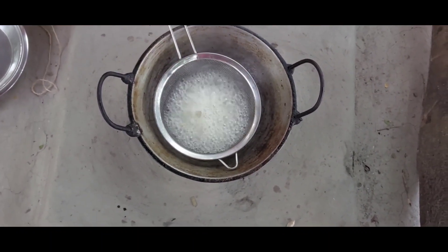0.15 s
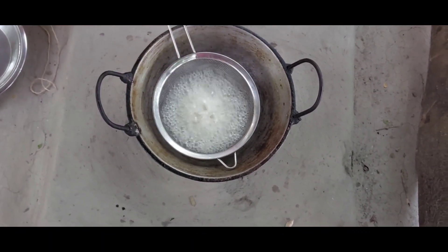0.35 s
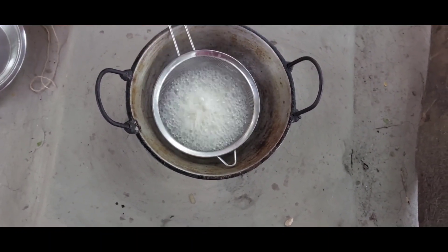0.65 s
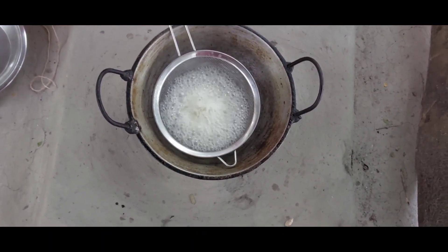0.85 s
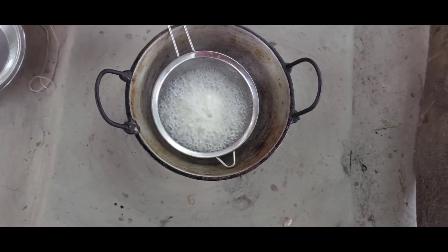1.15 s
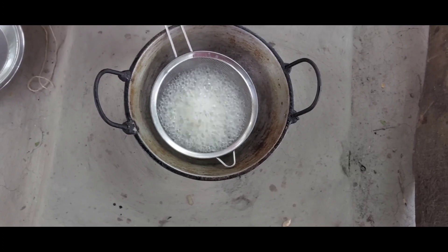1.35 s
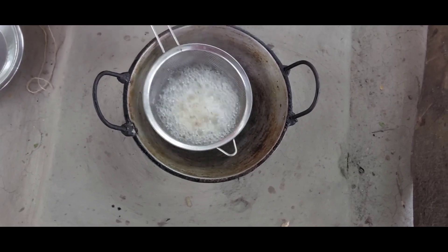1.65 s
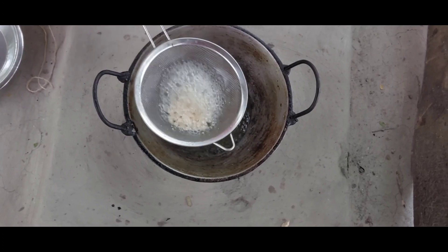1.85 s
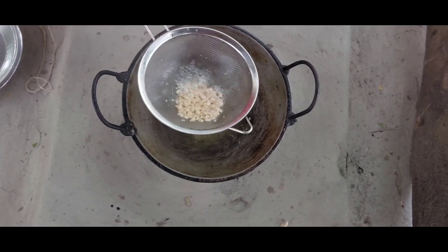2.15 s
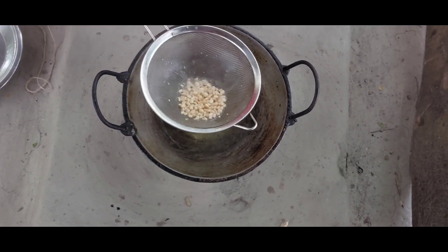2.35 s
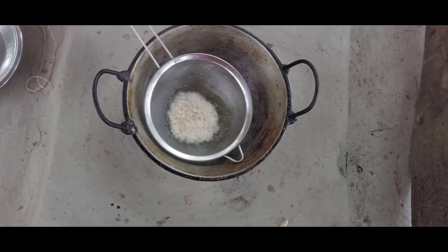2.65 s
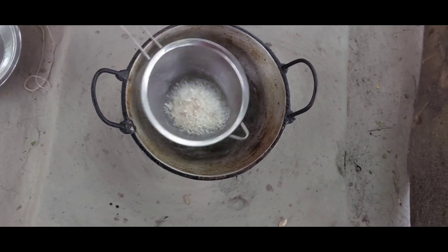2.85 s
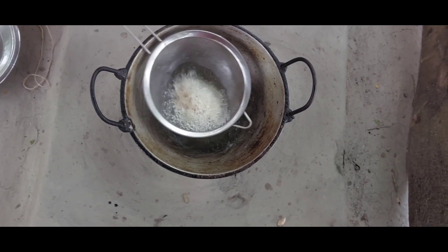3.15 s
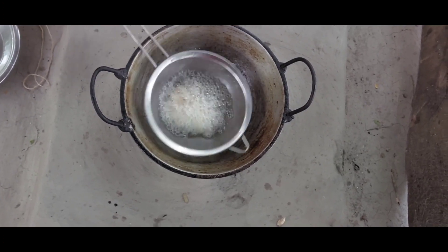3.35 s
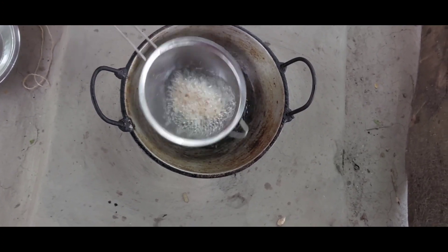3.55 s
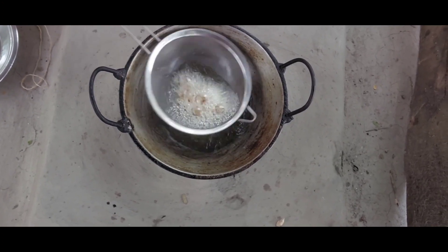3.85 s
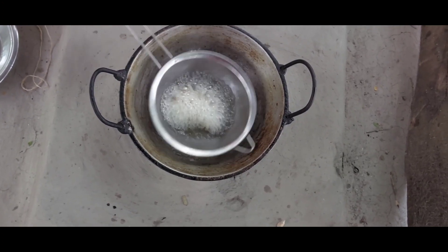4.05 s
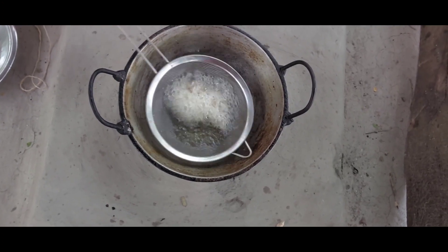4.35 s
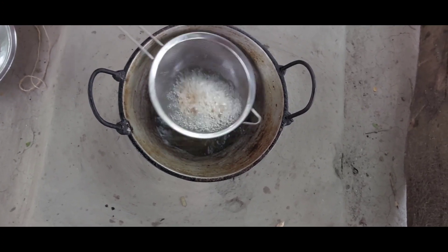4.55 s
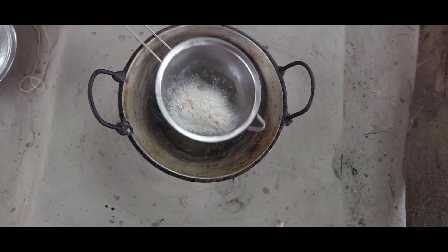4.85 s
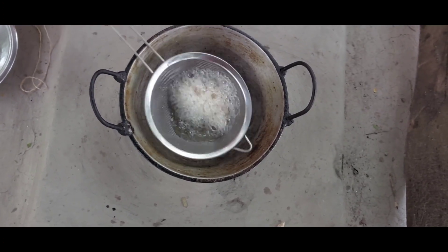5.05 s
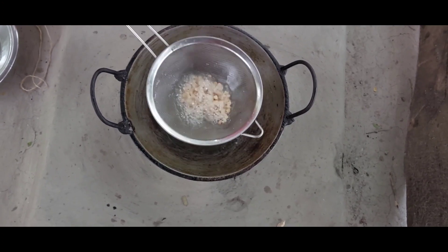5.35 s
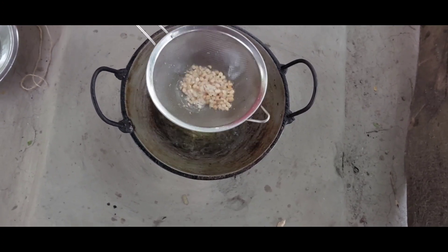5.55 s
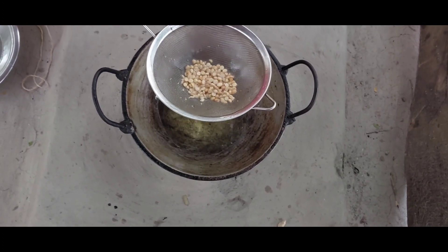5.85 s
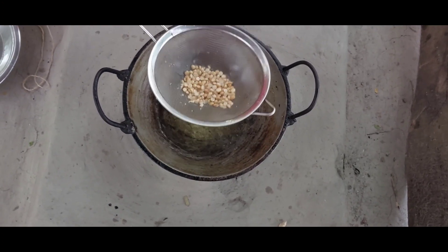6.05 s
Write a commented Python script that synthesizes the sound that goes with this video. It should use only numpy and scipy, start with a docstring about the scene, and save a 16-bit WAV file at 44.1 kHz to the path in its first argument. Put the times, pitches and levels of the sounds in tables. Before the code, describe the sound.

Hot oil boils vigorously and settles to a sizzle, with dull pops, crisp snaps, fine hissing lifts and light metal strainer knocks.

```python
"""Over an iron pan of hot oil, lentils deep-fry in a wire strainer, heard by one microphone above the pan.
Under the foam, steam bubbles boil as tiny filtered bursts over a noisy rush and burst with dull pulsed pops.
Lifted out, the wet lentils hiss, snap brightly, whistle as narrow tones and drip as rising sines.
The shaken strainer knocks on the pan with noise scuffs, resonant thuds and one wire ping.
A low rumble of lumpy noise wavers under it all, with a few soft low bumps."""
import sys
import numpy as np
from scipy import signal
from scipy.fft import rfft, irfft, next_fast_len
from scipy.io import wavfile
from scipy.ndimage import uniform_filter1d, map_coordinates

SR = 44100
rng = np.random.default_rng(int(sys.argv[2]) if len(sys.argv) > 2 else 0)


def nominal_scale(level):
    """Amplitude ratio for a level in decibels (scalar or array-like)."""
    x = np.asarray(level, float) / 20
    return 10 ** x


def store_wav(level_fs):
    """Save 16-bit WAV to argv[1]."""
    pcm = np.round(np.clip(np.atleast_2d(level_fs), -1, 1) * 32767)
    wavfile.write(sys.argv[1], SR, pcm.T.astype(np.int16))


N = 273861  # samples, about 6.21 s


def unit(x):
    """Scale to rms 1."""
    return x / np.sqrt(np.mean(x ** 2) + 1e-20)


def curves(rows):
    """Draw one value per sample for each column after the time."""
    s, *cols = np.transpose(rows)
    return [np.interp(np.arange(N) / SR, s, c) for c in cols]


def wobble(rate):
    """A smooth random curve with rate knots a second."""
    knots = rng.standard_normal(int(N * rate / SR) + 4)
    return map_coordinates(knots, [np.arange(N) * rate / SR])


def bells(rows):
    """Sum of smooth humps (time [s], height, half length to 1/e [s])."""
    t = np.arange(N) / SR
    return sum(height * np.exp(-((t - s) / half) ** 2) for s, height, half in rows)


def filtered(x, response):
    """Multiply the spectrum of x by a complex response of frequency."""
    m = next_fast_len(N + 8192)
    return irfft(rfft(x, m) * response(np.fft.rfftfreq(m, 1 / SR)), m)[..., :N]


def resonance(f, centre, width):
    """Response of one damped mode, 1 at its centre; all in Hz."""
    return 1j * f * width / (centre * centre - f * f + 1j * f * width)


def coloured(x, spectrum):
    """Pass x through a causal minimum-phase filter with points (frequency [Hz], gain [dB])."""
    f, db = np.transpose(spectrum)
    hz = np.fft.rfftfreq(4096, 1 / SR)
    cepstrum = irfft(np.log(nominal_scale(np.interp(np.log(hz + 1), np.log(f), db))))
    # folding the cepstrum forward in time makes the filter causal
    cepstrum[1:len(hz) - 1] *= 2
    cepstrum[len(hz):] = 0
    impulse = irfft(np.exp(rfft(cepstrum)))
    return signal.fftconvolve(x, impulse)[:N]


def patchy(depth_db):
    """Noise whose gain varies in small patches of time and pitch, as bubbles come in clusters."""
    z = signal.stft(rng.standard_normal(N), nperseg=256)[2]
    field = uniform_filter1d(rng.standard_normal(z.shape), size=4, axis=0)
    field = uniform_filter1d(field, size=8, axis=1)
    return signal.istft(z * nominal_scale(depth_db * unit(field)), nperseg=256)[1][:N]


def bubbles(spectrum, grain_spectrum, per_s, spread_db, flicker_db, grain_db):
    """Tiny bursts of uneven size over a smooth rush; a random inverted echo gives each its own tone."""
    when, lag = rng.random((2, 20000))
    live = np.clip(per_s * N / SR - np.arange(len(when)), 0, 1)  # only as many bursts as the rate asks for
    size = live * nominal_scale(spread_db * np.clip(rng.standard_normal(len(when)), -3, 2.6))
    at = (when * N).astype(int)
    echo_at = at + 2 + (24 * lag).astype(int)
    train = np.bincount(at, -size, N + 64) + np.bincount(echo_at, size, N + 64)
    swell = nominal_scale(flicker_db * (wobble(9) + wobble(30)))
    grains = unit(coloured(train, grain_spectrum))
    rush = unit(coloured(patchy(depth_db=1.65), spectrum))
    return swell * (nominal_scale(grain_db) * grains + rush) / np.sqrt(1 + nominal_scale(grain_db) ** 2)


def pops(rows, lead, tail_db, tail_s):
    """Each pop: suction, a push half a ring period later, a slow rebound and scattered echoes off the pan."""
    out, t = np.zeros(N + SR), np.arange(1600) / SR
    middle = 400  # sample of the push
    scatters = rng.standard_normal((len(rows), len(t)))
    for (s, db, hz, sharp), scatter in zip(rows, scatters):
        def pulse(turns, wide):
            periods = hz * (t - middle / SR) - turns
            return np.exp(-(2 * sharp / wide * periods) ** 2) / wide

        suction, push, rebound = pulse(-0.49, 1), pulse(0, 0.9), pulse(0.47, 1.68)
        pop = push - lead * suction - (1 - lead) * rebound
        echoes = scatter * nominal_scale(tail_db - 60 * t / tail_s) * (t > .0004)
        tail = np.convolve(pop, echoes)[:len(t)] / np.sqrt(SR / hz)
        out[round(s * SR):][:len(t)] += nominal_scale(db) * (pop + tail)
    return out[middle:middle + N]


def scattered(level_db, count, spread_db, low_hz, high_hz, sharp):
    """Rows for small pops at random moments, their size following a level."""
    when, size, pitch = rng.random((count, 3)).T
    db = level_db[(when * N).astype(int)] - spread_db * size
    hz = low_hz * (high_hz / low_hz) ** pitch
    return list(zip(when * N / SR, db, hz, sharp + 0 * when))


def levels():
    """Boil, sizzle, hiss and how far the boil covers the hiss, in dB; each shake bares the lentils briefly."""
    # course of the frying, before shakes and trims: boil in the oil, sizzle at the surface, hiss of
    # the bared lentils: (time [s], boil [dB], sizzle [dB], hiss [dB])
    fry_course = [(0, -45.5, -51, -64.5), (.09, -48.5, -58, -71.5), (.3, -52.5, -60, -69),
                  (.63, -57.5, -60.5, -76), (.92, -58, -61.5, -76.5), (1.2, -58, -57.5, -72.5),
                  (1.43, -60, -59.5, -73), (1.53, -56.5, -59.5, -64.5), (1.71, -61, -58, -59.5),
                  (1.93, -67, -55, -53.5), (2.07, -63, -54.5, -51), (2.19, -63, -56, -51),
                  (2.24, -58, -55.5, -44.5), (2.37, -60, -53.5, -47.5), (2.52, -66, -54.5, -52.5),
                  (2.61, -71, -53, -49.5), (2.7, -64, -52, -59), (2.79, -64, -60, -65),
                  (2.87, -58.5, -55.5, -64.5), (3.4, -58, -56, -62.5), (4.05, -58, -55.5, -61.5),
                  (4.55, -56.5, -54, -61.5), (5.0, -57.5, -55.5, -63), (5.15, -61.5, -56.5, -63),
                  (5.29, -64.5, -50.5, -53), (5.5, -66, -52.5, -47.5), (5.68, -64, -53, -48),
                  (5.78, -65.5, -57.5, -49), (6.21, -67.5, -57, -51)]
    # shakes of the strainer: (time [s], swell of the hiss [dB])
    shake_rows = [(2.97, 3.5), (3.27, 3), (3.6, 6.5), (3.97, 3), (4.3, 1.5), (4.64, -1), (4.82, 1)]
    boil_db, sizzle_db, hiss_db = curves(fry_course)
    shake_db = bells([(s, db, 0.06) for s, db in shake_rows])
    boil_db = boil_db - 0.3 * shake_db
    sizzle_db = sizzle_db + 0.6 * shake_db
    hiss_db = hiss_db + shake_db
    return boil_db, sizzle_db, hiss_db, boil_db - hiss_db


def frying():
    """Four sizes of steam bubble: deep boil, surface sizzle, fizz, fine hiss."""
    # colours of the smooth rushes and of the boil's single bursts: (frequency [Hz], relative level [dB])
    crackle_spectrum = [(150, -30), (330, -16), (600, -2), (1000, 7), (1400, 0), (1900, -10), (2800, 0),
                        (4500, -9), (7000, -25.5)]
    boil_spectrum = [(250, -53), (480, -36.5), (700, -8.5), (1000, 1), (1400, 2.5), (1900, -6.5),
                     (2800, -11), (3800, -18.5), (5000, -37)]
    sizzle_spectrum = [(900, -34), (1500, -9.5), (2000, -4), (2800, -0.5), (3700, -0.5), (4500, -8),
                       (6000, -25.5), (9000, -45.5)]
    fizz_spectrum = [(2500, -33), (4000, -0.5), (4800, 0), (6100, 0), (7500, -6.5), (10000, -17),
                     (14000, -40)]
    hiss_spectrum = [(4000, -34.5), (6500, -1), (8000, 0.5), (10600, 3), (13800, -4.5), (15700, -8.5),
                     (16600, -37)]
    boil_db, sizzle_db, hiss_db, cover_db = levels()
    fizz_db = sizzle_db + 0.43 * (hiss_db - sizzle_db) - 1.5  # between sizzle and hiss
    # the more the boil covers the hiss, the more single bubbles stand out
    crackle_db = -9.5 + 0.65 * cover_db
    spit_db = -4.5 + 0.27 * cover_db
    boil = nominal_scale(boil_db + 0.54) * bubbles(
        boil_spectrum, crackle_spectrum, per_s=200, spread_db=2.5, flicker_db=0.9, grain_db=crackle_db)
    sizzle = nominal_scale(sizzle_db + 0.26) * bubbles(
        sizzle_spectrum, sizzle_spectrum, per_s=700, spread_db=3, flicker_db=1.36, grain_db=-6)
    fizz = nominal_scale(fizz_db + 2.0) * bubbles(
        fizz_spectrum, fizz_spectrum, per_s=500, spread_db=5.5, flicker_db=0.1, grain_db=spit_db - 3.5)
    hiss = nominal_scale(hiss_db - 0.76) * bubbles(
        hiss_spectrum, hiss_spectrum, per_s=250, spread_db=3.5, flicker_db=0.9, grain_db=spit_db)
    # foam dulls the top of the hiss
    top = filtered(hiss, lambda hz: 1 / (1 + (11500 / (hz + 1)) ** 12))
    top_gain = nominal_scale(0.5 - 0.2 * cover_db)
    return boil + sizzle + fizz + hiss + (top_gain - 1) * top


def rumble():
    """Lumpy low noise that swells now and then, and above it the murmur of the covered boil."""
    # swells added to the floor of the rumble: (time [s], height [dB], half length to 1/e [s])
    swell_rows = [(0.054, -70, 0.034), (0.55, -63, 0.049), (0.82, -67, .02), (.95, -66, 0.054),
                  (1.225, -60, 0.045), (1.696, -74, 0.081), (1.956, -74, 0.042), (2.26, -79, 0.071),
                  (2.466, -64, 0.033), (2.57, -70, 0.035), (2.89, -74, 0.028), (3.272, -79, 0.046),
                  (3.555, -64.5, 0.057), (3.81, -76, 0.051), (4.08, -81, 0.041), (4.406, -62, 0.053),
                  (4.598, -63, 0.046), (4.842, -67, .07), (5.293, -68.5, .06), (5.47, -74, 0.027),
                  (5.697, -82, 0.054), (5.96, -76, .03), (6.17, -75, .06)]
    # colours of rumble and murmur: (frequency [Hz], relative level [dB])
    low_spectrum = [(20, -34), (35, -9), (55, 0), (75, -8), (110, -16), (200, -48)]
    murmur_spectrum = [(60, -7.5), (110, -1), (170, 0), (250, -9), (400, -13.5), (700, -29)]
    swells = bells([(s, nominal_scale(db), half) for s, db, half in swell_rows])
    low_gain = nominal_scale(-81.5 + 2.7 * wobble(9.6)) + swells
    low = low_gain * unit(coloured(rng.standard_normal(N), low_spectrum))
    cover_db = levels()[3]
    murmur_gain = nominal_scale(-85 + 0.48 * cover_db + 3.6 * wobble(29))
    return low + murmur_gain * unit(coloured(rng.standard_normal(N), murmur_spectrum))


def bursts():
    """Steam bursts under the foam: big ones, and many small ones while the boil covers the hiss."""
    # big bursts, before the foam's colouring: (time [s], level [dB], ring [Hz], sharpness [1])
    burst_rows = [(0.0187, -20.5, 1170, 4.6), (0.0276, -20.5, 1060, 4.4), (0.0333, -27, 935, 3.6),
                  (0.0409, -28, 880, 2.9), (0.0683, -32, 1030, 6.3), (0.0832, -22.5, 1250, 4.2),
                  (0.1138, -24.5, 835, 2.6), (0.1383, -30, 700, 7.0), (0.1784, -33, 820, 3.5),
                  (0.1836, -33, 1050, 2.3), (0.2074, -36, 775, 3.5), (0.2414, -23.5, 940, 5.4),
                  (0.256, -25.5, 1120, 3.2), (0.2595, -30, 835, 5.5), (0.2753, -31.5, 790, 5.5),
                  (0.3193, -28, 840, 4.0), (0.3391, -34, 1140, 4.2), (0.343, -23.5, 830, 3.8),
                  (0.3538, -29.5, 890, 4.5), (0.3785, -33, 980, 4.1), (0.4168, -31.5, 840, 4.4),
                  (0.4538, -30, 1010, 4.1), (0.5104, -29, 840, 3.9), (0.531, -33, 900, 2.5),
                  (0.5532, -37, 820, 4.6), (0.6266, -31.5, 930, 5.2), (0.6736, -29, 1010, 3.1),
                  (0.6917, -34, 950, 3.9), (0.7076, -25.5, 790, 3.8), (0.7296, -27.5, 1120, 4.4),
                  (0.7907, -16, 894, 5.7), (0.8154, -30.5, 980, 3.7), (0.9071, -30, 920, 2.7),
                  (0.9273, -32.5, 830, 5.2), (0.9609, -18, 846, 4.05), (0.9653, -31, 814, 4.5),
                  (0.9724, -32.5, 940, 3.7), (1.0462, -34, 826, 5.5), (1.146, -35, 935, 4.7),
                  (1.1668, -24, 1030, 3.4), (1.1798, -18.5, 950, 5.2), (1.3786, -32.5, 930, 3.3),
                  (1.4137, -31, 830, 4.3), (1.5634, -24.5, 1170, 3.4), (1.6103, -36, 900, 3.7),
                  (1.7285, -24, 1750, 3), (1.9866, -28, 2000, 7.7), (2.054, -26.5, 2040, 3.5),
                  (2.0832, -36, 3180, 2.5), (3.1616, -32, 880, 2.8), (3.5099, -39.5, 2500, 2.8)]
    # what the foam lets through: (frequency [Hz], gain [dB])
    foam_gain = [(150, -14.5), (350, -9), (700, 0), (1800, -0.5), (2800, 4.5), (4500, 8.5), (9000, -3)]
    boil_db, _, _, cover_db = levels()
    small = scattered(boil_db + 8 + 0.7 * cover_db, count=560, spread_db=17,
                      low_hz=610, high_hz=1310, sharp=4.9)
    return coloured(pops(burst_rows + small, lead=0.33, tail_db=-6.0, tail_s=0.014), foam_gain)


def snaps():
    """Bright surface snaps: big ones and many small ones, most prominent while foam hides the hiss."""
    # big snaps: (time [s], level [dB], ring [Hz])
    snap_rows = [(0.1199, -38, 4700), (0.1515, -29, 10000), (0.5262, -29.5, 4570), (1.1343, -32.5, 13900),
                 (1.4841, -36, 8600), (1.4954, -33.5, 14000), (1.5032, -28, 5000), (1.5801, -31, 14000),
                 (1.6373, -30, 10500), (1.6483, -31, 9700), (1.6662, -21.5, 12400), (1.6704, -26, 14000),
                 (1.6747, -23, 9800), (1.6869, -27, 8500), (1.6929, -26, 13600), (1.7256, -25, 12900),
                 (1.7308, -35, 4600), (1.738, -23, 11600), (1.7652, -20, 13400), (1.7724, -23, 11500),
                 (1.7856, -29, 12000), (1.816, -29, 11700), (1.8984, -28, 13100), (1.9283, -26, 14000),
                 (1.9865, -20, 9050), (2.0902, -31, 9300), (2.1237, -26, 7400), (2.6986, -17.5, 9900),
                 (2.767, -35, 13400), (2.8863, -33, 9600), (3.0421, -39, 11300), (3.0744, -33, 9400),
                 (3.2653, -16.5, 14300), (3.29, -36, 12000), (3.3097, -34, 8400), (3.5102, -29, 8400),
                 (3.7214, -29, 13000), (3.8534, -37, 13000), (3.93, -37, 14000), (3.9767, -38, 13100),
                 (4.2577, -31, 11800), (4.3264, -8.5, 7700), (4.3364, -35, 12800), (4.4824, -31, 14000),
                 (4.66, -39, 14000)]
    sharpness = 1.52
    _, _, hiss_db, cover_db = levels()
    small = scattered(hiss_db + 26.5 + 0.5 * cover_db, count=260, spread_db=18,
                      low_hz=9000, high_hz=16000, sharp=sharpness)
    big = [(*row, sharpness) for row in snap_rows]
    return pops(big + small, lead=0.58, tail_db=-6.5, tail_s=0.0037)


def drips():
    """A drop falling back into the oil traps a bubble whose pitch rises as it dies."""
    # oil dripping from the lifted strainer: (time [s], level [dB], starting pitch [Hz], 60 dB decay [s])
    drip_rows = [(2.213, -44.5, 840, 0.035), (2.257, -43.5, 784, 0.053), (2.293, -40.5, 845, 0.03),
                 (5.67, -47, 2250, .04), (5.693, -43, 2180, 0.044), (5.745, -59.5, 760, 0.21),
                 (5.82, -49, 1260, .04), (5.876, -51, 1100, 0.057), (5.97, -50.5, 1005, 0.085)]
    out, t = np.zeros(N + SR), np.arange(SR // 8) / SR
    for s, db, hz, t60 in drip_rows:
        phase = 2 * np.pi * hz * (t + 0.18 * t ** 2 / t60)
        onset = 1 - np.exp(-t / 0.0028)
        out[round(s * SR):][:len(t)] += nominal_scale(db - 60 * t / t60) * onset * np.sin(phase)
    return out[:N]


def whistles():
    """Steam whistles briefly from the draining lentils: unsteady narrow tones that swell and fade."""
    # whistles: (centre time [s], time from centre to 1/e squared [s], pitch [Hz], level [dB])
    whistle_rows = [(2.233, 0.024, 10600, -45), (2.31, 0.014, 8400, -41.5), (2.325, 0.065, 6080, -48),
                    (2.356, 0.097, 4740, -48.5), (2.458, 0.045, 3200, -60), (2.53, .04, 5900, -52),
                    (2.674, 0.046, 2800, -55)]
    t, out = np.arange(N) / SR, np.zeros(N)
    for s, length, hz, db in whistle_rows:
        hump = np.exp(-2 * ((t - s) / length) ** 2)
        out += nominal_scale(db) * hump * wobble(0.081 * hz) * np.sin(2 * np.pi * hz * t)
    return out


def bumps():
    """Soft low bumps, made as slow pops with strong scattered tails."""
    # bumps: (time [s], level [dB], ring [Hz], sharpness [1])
    bump_rows = [(2.45, -48, 115, 2.1), (3.575, -62, 130, 2), (3.81, -61, 140, 2.3), (4.39, -55, 180, 2.4)]
    return pops(bump_rows, lead=0.58, tail_db=0, tail_s=0.058)


def strainer():
    """Each knock is a rough scuff of wire on iron and a thud that the oil-filled pan lets die."""
    # knocks, before trims and the pan's ring:
    # (time [s], scuff level [dB], thud level [dB], scuff pitch [Hz], scuff's 20 dB decay [s])
    knock_rows = [(2.81, -30.5, -58, 2060, 0.0082), (3.074, -33, -70, 2500, 0.0083),
                  (3.157, -49, -59.5, 1000, 0.0041), (3.386, -30.5, -58.5, 2780, 0.011),
                  (3.725, -31.5, -59, 2380, 0.015), (4.1145, -24, -61.5, 3950, 0.012),
                  (4.383, -22, -63.5, 2320, 0.0075), (4.504, -23, -61.5, 3680, 0.0045),
                  (4.709, -37, -85, 2400, 0.0037), (4.758, -31, -68, 1900, 0.0066),
                  (4.802, -35, -72, 3000, .01)]
    # modes of the oil-damped pan: (frequency [Hz], width [Hz], gain [dB])
    pan_modes = [(228, 63, 2.5), (352, 97, 1), (880, 54, -1), (1100, 94, -9)]
    # one wire rings once: (time [s], level [dB], pitch [Hz], 60 dB decay [s])
    wire_ping = (4.1045, -30, 5050, .012)
    scuff, thud, t = np.zeros(N + SR), np.zeros(N + SR), np.arange(SR // 4) / SR
    for s, db, thud_db, hz, length in knock_rows:
        start = round(s * SR)
        scrape, blow = rng.standard_normal((2, len(t)))
        band = signal.butter(3, [hz / 2.2, hz * 1.6], "band", fs=SR)
        wire = unit(signal.lfilter(*band, scrape))
        onset = 1 - np.exp(-t / 0.00044)
        scuff[start:][:len(t)] += nominal_scale(db - 8.0 - 20 * t / length) * onset * wire
        thud[start:][:len(t)] += nominal_scale(thud_db + 13.5 - 60 * t / 0.45) * blow
    s, db, hz, t60 = wire_ping
    ring = (1 - np.exp(-t / .001)) * np.sin(2 * np.pi * hz * t)
    scuff[round(s * SR):][:len(t)] += nominal_scale(db - 60 * t / t60) * ring

    def pan(f):
        # neighbouring modes alternate in sign
        return sum((-1) ** k * nominal_scale(gain_db) * resonance(f, centre, width)
                   for k, (centre, width, gain_db) in enumerate(pan_modes))

    return scuff[:N] + filtered(thud[:N], pan)


def dark_bands(x):
    """Notch the bands where the pan's echo cancels the direct sound."""
    # dark bands: (centre [Hz], width [Hz], depth [0-1])
    notch_rows = [(4120, 800, 0.65), (6810, 720, 0.67)]

    def dark(f):
        return np.prod([1 - np.clip(depth, 0, 1) * resonance(f, centre, width)
                        for centre, width, depth in notch_rows], axis=0)

    return filtered(x, dark)


def scene():
    """Frying, pops, drips and whistles share the dark bands; one microphone feeds both channels."""
    in_pan = frying() + bursts() + snaps() + drips() + whistles()
    mono = dark_bands(in_pan) + rumble() + bumps() + strainer()
    return np.array([mono, mono])


def top_cut(x):
    """Nothing passes above the cut-off."""
    return signal.sosfilt(signal.butter(12, 16670, fs=SR, output="sos"), x)


def record(dry):
    """Add a very faint hiss, different in each channel."""
    # colour of the faint hiss: (frequency [Hz], relative level [dB])
    faint_hiss_spectrum = [(40, 0), (300, -6), (1200, -25), (5000, -15), (12000, -1.5), (16000, -2),
                           (17000, -39)]
    faint_hiss = np.array([unit(coloured(rng.standard_normal(N), faint_hiss_spectrum)) for _ in dry])
    mix = dry + nominal_scale(-89.0) * faint_hiss
    return top_cut(mix)


dry = scene()
out = record(dry)
store_wav(out)
```